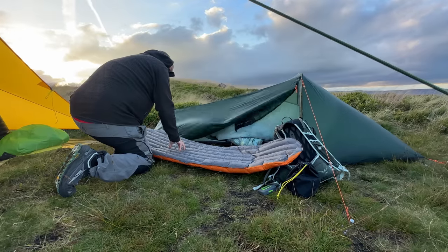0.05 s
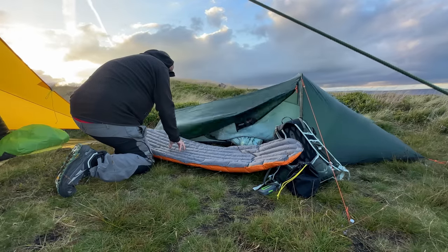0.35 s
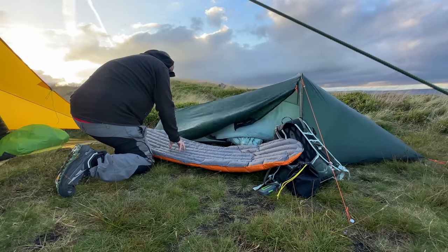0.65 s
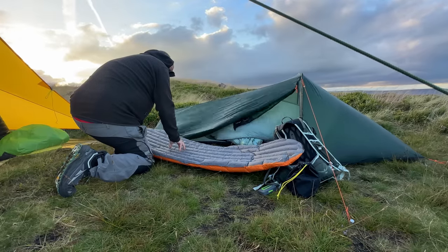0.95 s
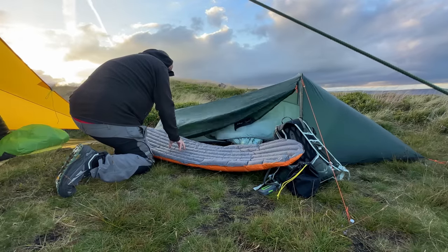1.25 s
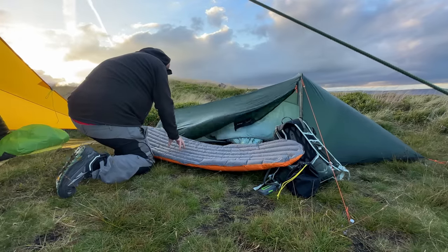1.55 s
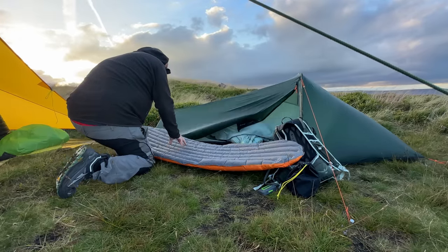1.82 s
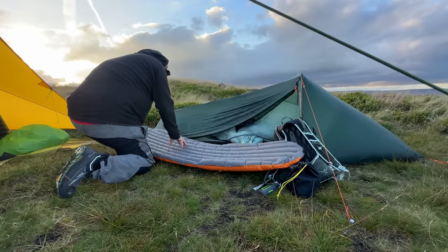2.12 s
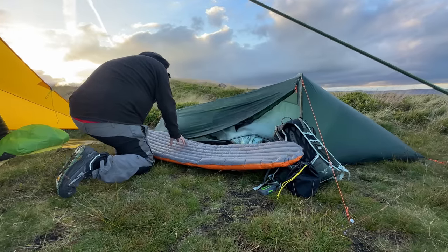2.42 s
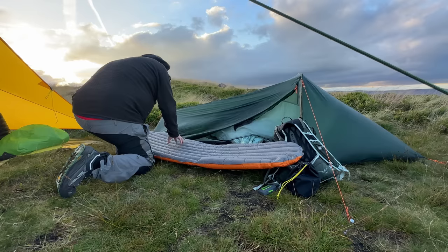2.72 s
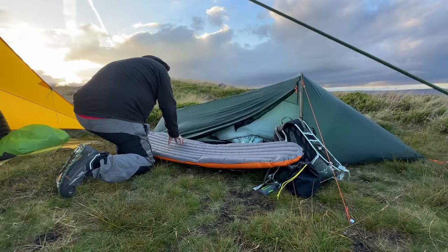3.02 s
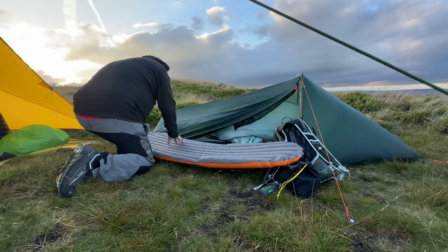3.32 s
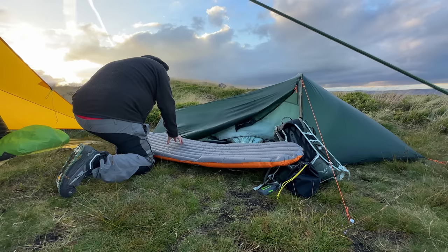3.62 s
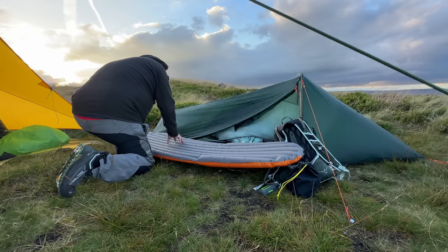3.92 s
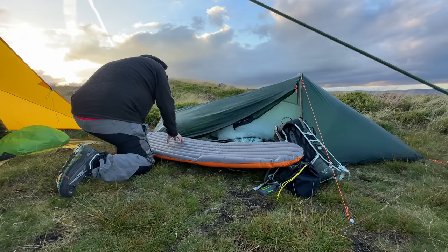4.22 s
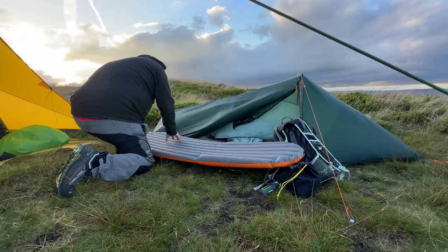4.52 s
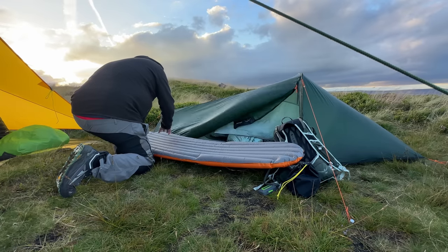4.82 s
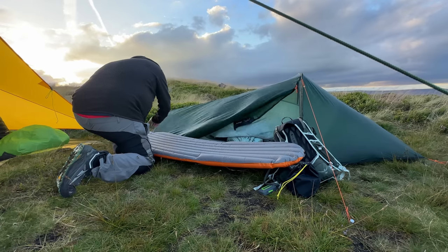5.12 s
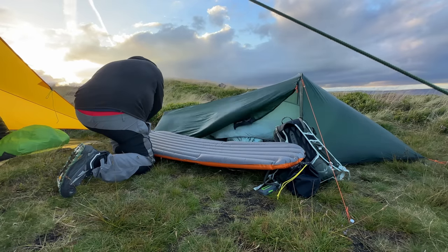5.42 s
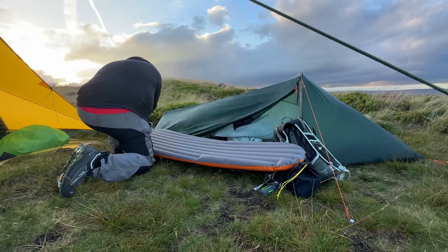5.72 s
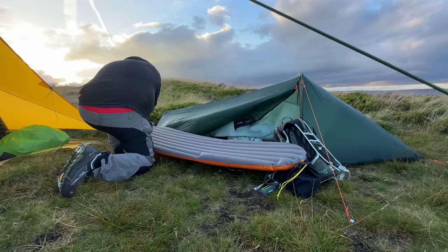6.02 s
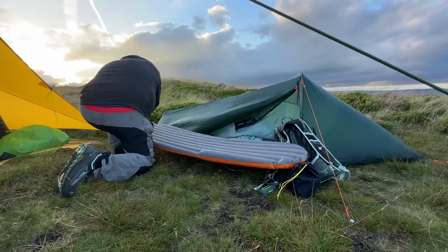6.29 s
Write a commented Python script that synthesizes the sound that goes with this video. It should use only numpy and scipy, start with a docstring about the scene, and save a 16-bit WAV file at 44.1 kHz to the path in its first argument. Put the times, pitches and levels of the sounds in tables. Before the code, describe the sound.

A tiny battery air pump runs close to the microphone for the whole six and a half seconds, a high whine of several tones over a steady hiss of air. Its pitch creeps slightly upward as the tones swell and fade. From about 1.8 to 3.4 seconds the coated fabric of the inflating sleeping pad crinkles in small, sharp ticks. Four louder pops with a slight thump stand out at about 2.0, 3.4, 3.6 and 3.8 seconds. Fingers tap the pad dully near 2.3, 3.2, 3.7 and 5.3 seconds. From about 4.5 seconds the pump is turned, so its whine flutters more and the hiss grows brighter, with a faint airy whistle around 6 seconds. Light outdoor wind rumbles low on the microphone underneath, with brief gusts near 1.8, 2.1 and 3.9 seconds.

```python
"""Open grass, one microphone close to a tiny battery blower that is filling a sleeping pad.
The nine-blade impeller whines over rushing air and slowly speeds up as the pad pushes back.
Its tones swell and fade as the hand and body around it shift; late on, the pump is turned.
The coated fabric crinkles, is tapped by fingers and pops open four times. A light wind rumbles."""
import sys
import numpy as np
from scipy import signal
from scipy.fft import rfft, irfft, next_fast_len
from scipy.io import wavfile
from scipy.ndimage import uniform_filter1d

SR = 44100
rng = np.random.default_rng(int(sys.argv[2]) if len(sys.argv) > 2 else 0)


def log_audio(samples):
    """Write samples as a 16-bit WAV file to the path given in sys.argv[1]."""
    # one column per channel
    frames = np.atleast_2d(samples).T
    # limit to full scale, then quantise
    limited = np.clip(frames, -1, 1)
    pcm = np.round(limited * 32767).astype(np.int16)
    wavfile.write(sys.argv[1], SR, pcm)


N = 288843
N_FFT = next_fast_len(N, True)
EVENT_SAMPLES = SR // 4

# how far the pump is turned: (time [s], share [0-1])
PUMP_TURN = [(4.4, 0), (5.3, 0.44), (6.1, 0.86)]


def from_db(db):
    """Decibels to gain."""
    return 10 ** (np.asarray(db) / 20)


def rms_one(x):
    """Scale to unit rms."""
    return x / np.sqrt(np.mean(x ** 2) + 1e-20)


def in_time(rows):
    """Each column of a timed table, interpolated at every sample."""
    times, *columns = np.transpose(rows)
    return [np.interp(np.arange(N) / SR, times, column) for column in columns]


def bin_hz():
    """Frequency of each spectrum bin, at least 1 Hz."""
    return np.maximum(np.fft.rfftfreq(N_FFT, 1 / SR), 1)


def noise_spectrum(colour):
    """Random spectrum shaped by rows of (frequency [Hz], density [dB/Hz])."""
    hz, db = np.transpose(colour)
    white = rfft(rng.standard_normal(N_FFT)) * np.sqrt(SR / 2)
    return white * from_db(np.interp(np.log(bin_hz()), np.log(hz), db))


def drift(rate_hz):
    """Smooth random wander of unit rms, mostly slower than rate_hz."""
    step, settle = 20, 2000
    pole = np.exp(-2 * np.pi * rate_hz * step / SR)
    white = rng.standard_normal(N // step + settle + 2)
    slow = signal.lfilter([1], [1, -2 * pole, pole * pole], white)[settle:]
    return np.interp(np.arange(N) / step, np.arange(len(slow)), rms_one(slow))


def filtered(x, hz, kind):
    """Butterworth low-, high- or band-pass."""
    return signal.sosfilt(signal.butter(2, hz, kind, fs=SR, output="sos"), x)


def decay(t60):
    """A quarter second of envelope that falls 60 dB in t60 seconds."""
    return from_db(-60 * np.arange(EVENT_SAMPLES) / SR / t60)


def mode(hz, t60):
    """A resonance released suddenly."""
    return decay(t60) * np.cos(2 * np.pi * hz * np.arange(EVENT_SAMPLES) / SR)


def noise_burst(band_hz, t60):
    """A band of noise dying away."""
    return rms_one(filtered(rng.standard_normal(EVENT_SAMPLES), band_hz, "band")) * decay(t60)


def add(out, s, sound):
    """Mix a sound in at s seconds."""
    at = round(s * SR)
    out[at:at + len(sound)] += sound[:N - at]


def wind(waver_db=5, lumps_db=3.0):
    """Low, lumpy rumble on the microphone: a wavering breeze, and low swells that rise and fall."""
    # breeze between gusts: (time [s], level [dB])
    breeze = [(0, -53), (.9, -44), (1.35, -52.5), (2.2, -44.5), (2.95, -48), (4.3, -51.5), (5.0, -50.5),
              (5.5, -49), (6.55, -52.5)]
    # low swells in the rumble: (middle [s], length [s], peak [dB])
    swells = [(1.763, 0.3, -30.5), (2.105, 0.12, -32.5), (2.608, 0.45, -44), (3.3, 0.42, -40),
              (3.926, 0.26, -34), (4.89, 0.19, -44)]
    # colour of the rumble: (frequency [Hz], relative density [dB])
    colour = [(12, -8.5), (30, 0), (50, -4), (80, -13), (130, -18), (220, -31), (500, -58)]
    t = np.arange(N) / SR
    strength = from_db(in_time(breeze)[0] + waver_db * drift(1.8))
    for s, length_s, db in swells:
        arch = np.cos(np.pi * np.clip((t - s) / length_s, -.5, .5)) ** 2
        strength = np.hypot(strength, from_db(db) * arch)
    rumble = irfft(noise_spectrum(colour))[:N]
    return strength * rms_one(rumble * from_db(lumps_db * drift(6.9)))


def finger_taps(gain_db=7.5):
    """Handling noise: fingers touch the pad with short, dull taps."""
    # touches: (time [s], level before filtering [dB])
    touches = [(2.286, -33.5), (3.24, -32), (3.654, -35), (3.717, -37), (5.152, -41), (5.206, -33.5),
               (5.312, -36), (5.347, -37), (5.370, -41.5)]
    out = np.zeros(N)
    for s, db in touches:
        add(out, s, from_db(db + gain_db) * rng.standard_normal(EVENT_SAMPLES) * decay(t60=0.061))
    return filtered(out, [230, 750], "band")


def fabric_snap(crack_db, pitch=1, detune=0.08, sizzle_db=-2.0, rustle_db=-24):
    """A crease flips: the fabric's modes ring under a bright crack and a short rustle."""
    # modes of the taut fabric: (frequency [Hz], relative level [dB], t60 [s])
    fabric_modes = [(197.7, -17.5, 0.11), (297, -12.5, 0.059), (420, -17, 0.055), (690, -27, 0.022),
                    (1085, -11, 0.036), (1068, -11, 0.022), (1310, -10, 0.02), (1550, -25, 0.044),
                    (2380, -48, 0.0038), (4304, -20.5, 0.04)]
    body = np.zeros(EVENT_SAMPLES)
    for hz, db, t60 in fabric_modes:
        gain = from_db(db + 2 * rng.normal())
        body += gain * mode(pitch * hz * np.exp(detune * rng.normal()), t60)
    white = rng.standard_normal(EVENT_SAMPLES)
    crack = rms_one(filtered(white, 5000, "low") + from_db(sizzle_db) * white) * decay(t60=0.014)
    rustle = noise_burst([900, 2200], t60=0.088)
    return filtered(body, 4500, "low") + from_db(crack_db) * crack + from_db(rustle_db) * rustle


def crease_ticks(level_db=-41, spread_db=1.0):
    """Tiny creases ease at random as the fabric unfolds, each with a faint tick."""
    # pace of the ticks: (time [s], mean rate [1/s])
    tick_rate = [(1.6, 0.5), (3.2, 15), (4.1, 0.5)]
    per_s, = in_time(tick_rate)
    out = np.zeros(N)
    for at in np.flatnonzero(rng.random(N) < per_s / SR):
        add(out, at / SR, from_db(level_db - spread_db * rng.normal()) * fabric_snap(crack_db=-8))
    return out


def crinkles(gain_db=-2):
    """Single creases let go as the pad swells."""
    # creases: (time [s], relative level [dB], crack relative to that level [dB])
    creases = [(1.8372, -31, 1.5), (1.9503, -23, -16), (2.032, -26, -1), (2.5429, -26.5, -4.5),
               (2.5608, -25.5, -10), (2.6023, -24.5, -1), (2.6268, -26, -14), (2.6415, -13, -24),
               (2.648, -26, -17), (2.653, -18.5, -28), (2.6591, -14.5, -17), (2.9563, -39, 9),
               (3.0886, -34, -13), (3.237, -26.5, -8), (3.296, -30.5, -11), (3.351, -27, -21),
               (3.3818, -15, -30)]
    out = np.zeros(N)
    for s, db, crack_db in creases:
        add(out, s, from_db(db + gain_db) * fabric_snap(crack_db))
    return out


def chamber_pops(crack_db=-15, rebound_s=0.0026, rebound_db=-6, rebound_pitch=.72, shudder_db=-22):
    """A stuck chamber jumps open: the fabric snaps and rebounds, the air thumps, the pad shudders."""
    # openings: (time [s], snap [dB], fabric pitch [ratio], thump [dB], thump pitch [Hz],
    # thump t60 [s], ring [dB], ring pitch [Hz])
    openings = [(1.9831, -13.5, 0.909, -7, 140, 0.034, -13, 238),
                (3.3888, -14, 1.12, -11, 134, 0.098, -22.5, 324),
                (3.5955, -15.5, 1.03, -10.5, 228, 0.027, -28, 330),
                (3.831, -12, 1.05, -7.5, 238, 0.024, -12, 401)]
    out = np.zeros(N)
    for s, snap_db, pitch, thump_db, thump_hz, thump_t60, ring_db, ring_hz in openings:
        thump = from_db(thump_db) * mode(thump_hz, thump_t60)
        ring = from_db(ring_db) * mode(ring_hz, t60=0.046)
        shudder = from_db(thump_db + shudder_db) * noise_burst([140, 460], t60=0.13)
        snap = from_db(snap_db) * fabric_snap(crack_db, pitch)
        rebound = from_db(snap_db + rebound_db) * fabric_snap(crack_db, pitch * rebound_pitch)
        add(out, s, snap + shudder + filtered(thump + ring, 520, "low"))
        add(out, s + rebound_s, rebound)
    return filtered(out, 80, "high")


def rushing_air(flutter_db=1.52):
    """Turbulent flow, coloured by the housing; the hand shades each zone of pitch differently."""
    # flow before the pump is turned: (frequency [Hz], density [dB/Hz])
    facing_colour = [(200, -91.5), (400, -90), (1200, -87), (1560, -93.5), (1850, -84), (2120, -92.5),
                     (2450, -86.5), (3700, -91), (5200, -89), (6400, -96), (7100, -93.5), (8400, -99),
                     (10000, -90), (11000, -90.5), (15000, -92)]
    # flow with the pump fully turned: (frequency [Hz], density [dB/Hz])
    turned_colour = [(200, -88), (550, -84.5), (900, -85.5), (1300, -89.5), (1750, -81), (2050, -87.5),
                     (2800, -86.5), (3700, -92.5), (5400, -90), (7200, -91), (8000, -91), (10700, -84.5),
                     (13700, -83.5), (15400, -88)]
    # centres of the body, hiss and top zones: (frequency [Hz])
    zones_hz = [1120, 4970, 11700]
    # gain of each zone: (time [s], body [dB], hiss [dB], top [dB])
    shading = [(0, -0.5, -1, 0), (1.3, 0, 0, 1.5), (1.7, 1, 2, 2.2), (3.2, 2.7, 3.5, 0.7),
               (4.1, -2, 1.3, -4.5), (5.0, -2, -1.1, -2.5), (5.85, -3.5, -2.5, 0), (6.25, 0, 4.2, 1.5),
               (6.55, -0.5, 6.5, 0)]
    turned, = in_time(PUMP_TURN)
    facing, aside = noise_spectrum(facing_colour), noise_spectrum(turned_colour)
    out = np.zeros(N)
    for zone, db in zip(np.eye(len(zones_hz)), in_time(shading)):
        band = np.interp(np.log(bin_hz()), np.log(zones_hz), zone)
        flow = np.sqrt(1 - turned) * irfft(facing * band)[:N]
        flow += np.sqrt(turned) * irfft(aside * band)[:N]
        out += flow * from_db(db + flutter_db * drift(34))
    return out


def flickering(rush, still_db=.6, turning_db=2.3):
    """Narrow patches of the hiss flicker, more deeply as the pump is turned."""
    _, times, cells = signal.stft(rush, SR, nperseg=512)
    patches = uniform_filter1d(rng.standard_normal(cells.shape), size=4, axis=0)
    patches = uniform_filter1d(patches, size=22, axis=1)
    depth_db = still_db + turning_db * np.interp(times, *np.transpose(PUMP_TURN))
    gain = from_db(depth_db * rms_one(patches))
    gain /= np.sqrt(np.mean(gain ** 2, axis=0))
    return signal.istft(cells * gain, SR, nperseg=512)[1][:N]


def hollowed(rush):
    """The rush turns hollow as the pad fills: two narrow bands sink away."""
    # dips in the rush: (centre [Hz], width [Hz], gain [dB])
    dips = [(930, 184, -9.5), (3560, 230, -6)]
    # how far they have set in: (time [s], share [0-1])
    onset = [(1.7, 0.1), (2.8, 1)]
    gain_db = sum(db * np.exp(-((bin_hz() - hz) / width_hz) ** 2) for hz, width_hz, db in dips)
    hollow = irfft(rfft(rush, N_FFT) * from_db(gain_db))[:N]
    share, = in_time(onset)
    return (1 - share) * rush + share * hollow


def intake_whistle(width_hz=160):
    """Flow over the intake excites one broad resonance that slides with the hand."""
    # airy whistle: (time [s], centre [Hz], level [dB])
    resonance = [(4.9, 2390, -65), (5.5, 2350, -59.5), (5.8, 2370, -49.5), (6.1, 2455, -47),
                 (6.3, 2460, -49), (6.55, 2275, -58)]
    hz, db = in_time(resonance)
    turbulence = drift(width_hz) + 1j * drift(width_hz)
    return from_db(db) * np.real(turbulence * np.exp(2j * np.pi * np.cumsum(hz) / SR))


def faint_overtones(shaft_angle, turned, fade_db=2.4, smear_per_order=.016, gain_db=1.0):
    """Weak shaft harmonics, the higher the more smeared; they come and go more as the pump is turned."""
    # harmonics: (order, relative level at first [dB], relative level fully turned [dB])
    harmonics = [(4, -68.5, -70), (6, -75, -70), (11, -65, -62.5), (13, -76, -69), (14, -78, -69),
                 (15, -79, -67), (16, -79, -64), (17, -69, -66), (19, -77, -66), (20, -66, -70),
                 (21, -73, -68), (22, -65.5, -63), (23, -68.5, -61), (24, -71.5, -64.5), (25, -68.5, -65.5),
                 (26, -70, -70), (27, -60, -63)]
    out = np.zeros(N)
    for order, first_db, turned_db in harmonics:
        db = first_db + (turned_db - first_db) * turned
        db += fade_db * (1 + turned) * drift(4)
        smear = 1 + smear_per_order * order * (drift(35) + 1j * drift(35))
        out += from_db(db + gain_db) * np.real(smear * np.exp(1j * order * shaft_angle))
    return out


def strong_tone_levels(turned):
    """Level in dB at the microphone of each strong tone, keyed by its multiple of the shaft speed."""
    # hum of the unbalanced shaft: (time [s], level [dB])
    hum = [(0.0, -59), (3.1, -62), (3.79, -55.5), (5.1, -55), (6.41, -49), (6.55, -56.5)]
    # third order, swelling as the pump works harder: (time [s], level [dB])
    third = [(0.0, -68.5), (3.46, -65), (4.79, -56), (4.93, -49.5), (5.23, -55.5), (5.52, -42.3),
             (6.55, -52)]
    # seventh and eighth orders, from unequal blades: (time [s], level [dB])
    seventh = [(0.0, -59.5), (2.12, -52.5), (2.48, -60.6), (3.75, -55.5), (4.09, -61.2), (4.98, -47.5),
               (5.77, -62.5), (6.55, -73)]
    eighth = [(0.0, -59), (2.34, -65.9), (2.97, -46.7), (3.37, -62), (4.59, -57.9), (4.69, -53),
              (4.96, -61), (5.26, -51.5), (5.55, -69), (6.16, -59.3), (6.35, -41), (6.55, -51)]
    # blade tone, nine per turn, and its octave: (time [s], level [dB])
    blade = [(0.0, -49), (0.34, -46.5), (0.52, -52), (2.3, -51.5), (2.87, -44.5), (3.11, -38),
             (3.33, -43.5), (4.53, -46.5), (4.66, -55.5), (5.02, -48.5), (5.18, -72), (5.53, -68),
             (5.77, -50), (5.87, -74), (6.04, -45), (6.55, -57)]
    blade_octave = [(0.0, -37.8), (1.58, -41.5), (1.97, -47), (2.11, -41.5), (2.54, -52), (2.75, -46.2),
                    (3.04, -50.5), (3.1, -61), (3.41, -51.3), (4.2, -52.5), (4.68, -48.5), (4.83, -62),
                    (5.14, -37.5), (6.02, -37.5), (6.11, -52), (6.36, -48), (6.55, -32)]
    # tenth order, heard once the pump is turned: (time [s], level [dB])
    tenth = [(4.8, -70), (5.31, -63.2), (5.67, -68), (5.77, -60), (6.18, -62), (6.3, -50), (6.55, -47.5)]
    curves = {1: hum, 3: third, 7: seventh, 8: eighth, 9: blade, 10: tenth, 18: blade_octave}
    db = {order: in_time(curve)[0] for order, curve in curves.items()}
    db[2] = db[1] - 5
    db[5] = -58.5 - 19 * turned
    db[12] = db[10] - 4.5
    return db


def impeller_whine(jitter=0.000518, flutter_db=0.91, turning_flutter_db=2.3, skirt_db=-24):
    """Every tone is a multiple of the shaft speed; turbulence shakes their pitch and level."""
    # impeller speed, rising as the pad fills and pushes back: (time [s], speed [turns/s])
    shaft_speed = [(0.0, 557.1), (0.26, 555.5), (0.32, 558.3), (0.96, 562.5), (1.22, 560.7), (1.35, 562.9),
                   (1.72, 564.1), (2.66, 563.9), (3.62, 568.3), (3.81, 568.1), (4.28, 576.8), (4.46, 575.9),
                   (4.61, 581.0), (5.02, 581.8), (5.2, 585.1), (6.03, 592.6), (6.27, 597.3), (6.55, 598.0)]
    speed, = in_time(shaft_speed)
    turned, = in_time(PUMP_TURN)
    shaft_angle = 2 * np.pi * np.cumsum(speed * (1 + jitter * drift(34.7))) / SR
    out = faint_overtones(shaft_angle, turned)
    for order, db in sorted(strong_tone_levels(turned).items()):
        # short waves flutter most when the pump is moved
        depth_db = flutter_db + turning_flutter_db * turned * min(order / 9, 1)
        gain = from_db(db + depth_db * drift(11.2))
        roughness = 1 + from_db(skirt_db) * drift(220)
        out += gain * roughness * np.sin(order * shaft_angle + 2 * np.pi * rng.random())
    return np.sqrt(2) * out


def scene():
    """Pump, pad and wind reach one close microphone, so both channels are alike."""
    pump = impeller_whine() + hollowed(flickering(rushing_air())) + intake_whistle()
    pad = chamber_pops() + crinkles() + finger_taps() + crease_ticks()
    mono = pump + pad + wind()
    return np.array([mono, mono])


def record(dry):
    """The top treble is cut steeply."""
    cutoff_hz = 15700
    return signal.sosfilt(signal.ellip(16, .1, 80, cutoff_hz, fs=SR, output="sos"), dry)


dry = scene()
out = record(dry)
log_audio(out)
```